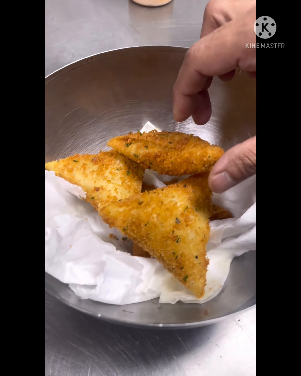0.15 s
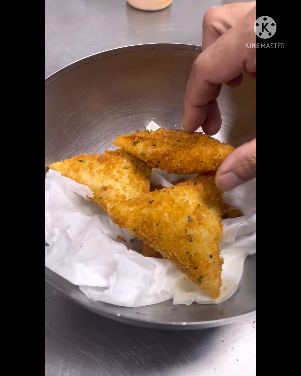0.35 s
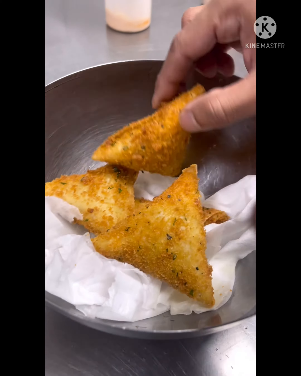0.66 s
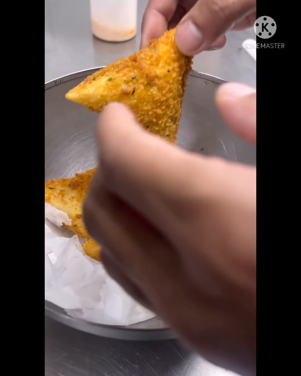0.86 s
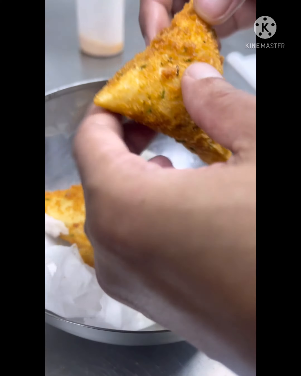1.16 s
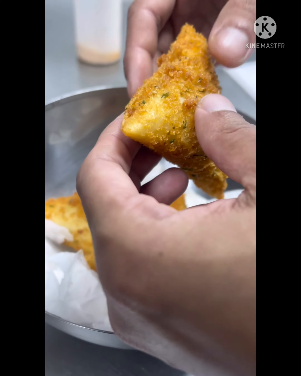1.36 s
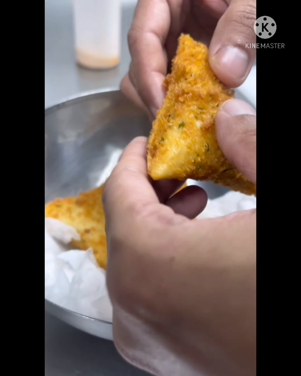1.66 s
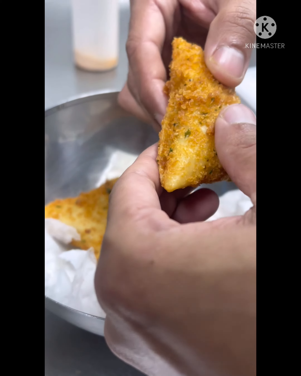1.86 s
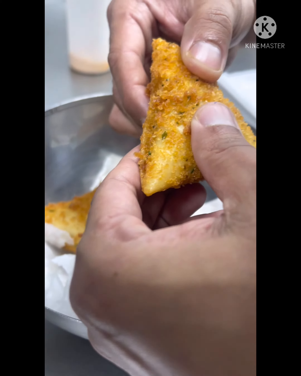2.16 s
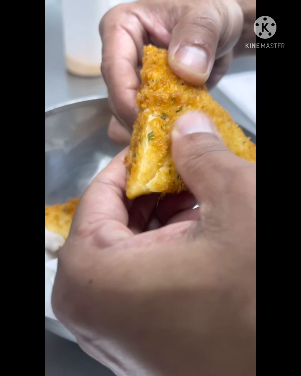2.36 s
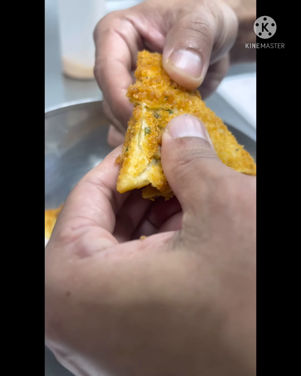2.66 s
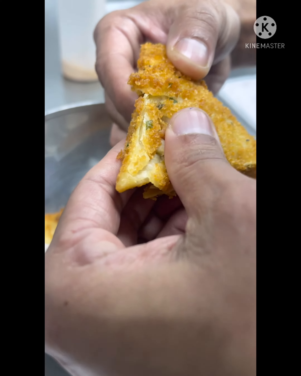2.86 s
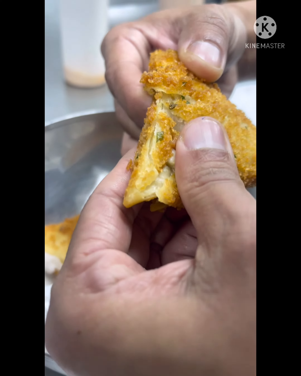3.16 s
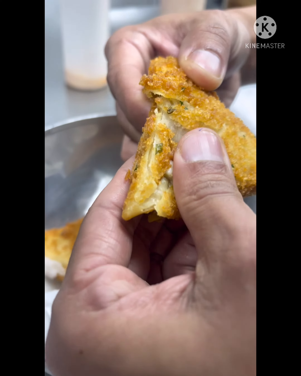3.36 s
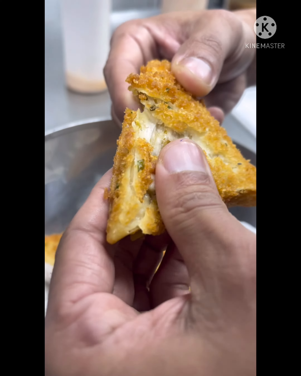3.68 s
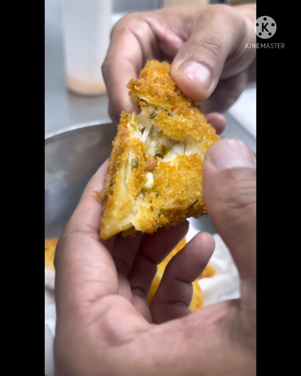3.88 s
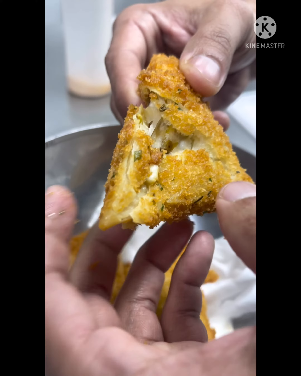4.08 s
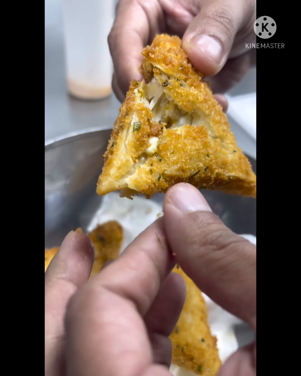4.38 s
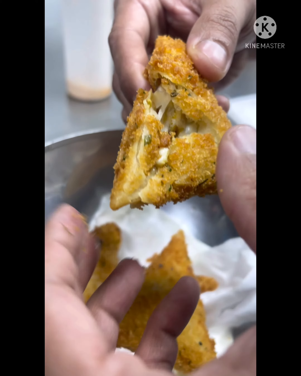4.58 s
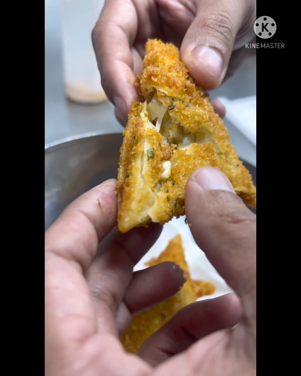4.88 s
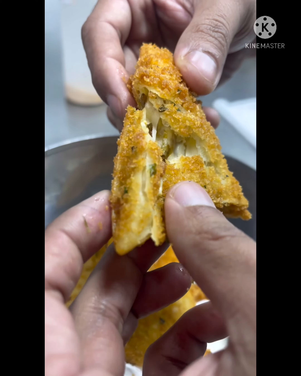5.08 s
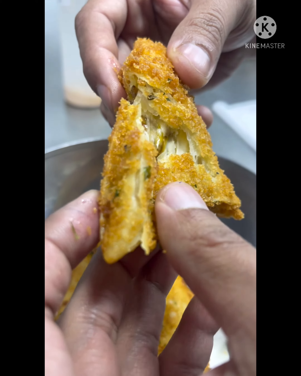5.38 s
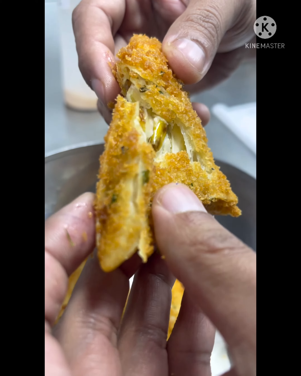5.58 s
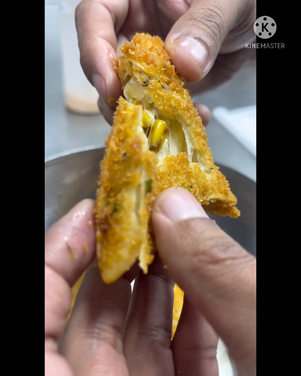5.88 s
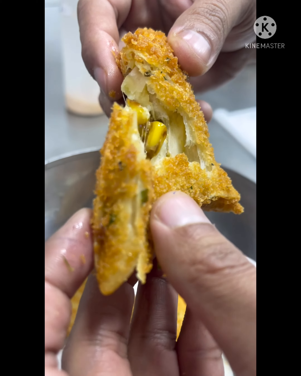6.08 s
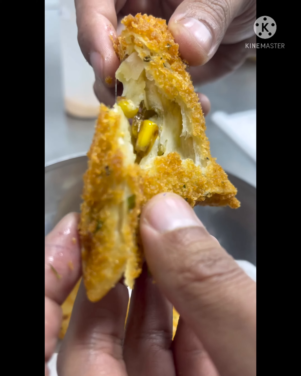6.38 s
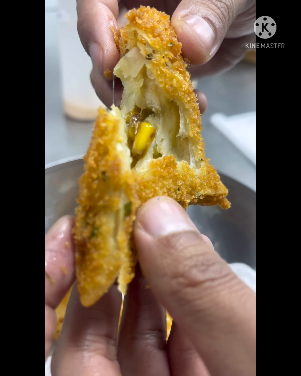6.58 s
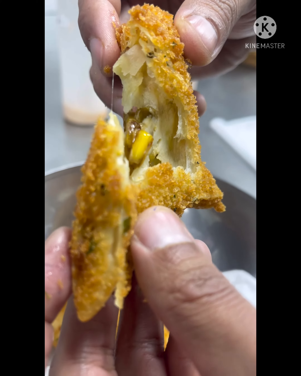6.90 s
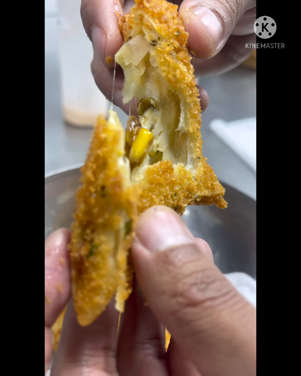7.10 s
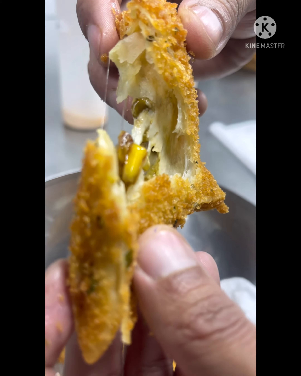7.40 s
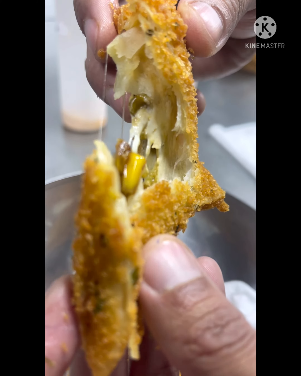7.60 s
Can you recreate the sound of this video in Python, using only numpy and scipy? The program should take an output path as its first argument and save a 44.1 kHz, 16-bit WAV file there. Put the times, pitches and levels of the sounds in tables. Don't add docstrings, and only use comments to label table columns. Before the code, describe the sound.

Brittle crust ticks, crunches and splits sharply close up, then crumbles faintly, while kitchen fans rumble and a distant door thuds.

```python
import sys
import numpy as np
from scipy import signal
from scipy.fft import rfft, irfft
from scipy.io import wavfile
from scipy.ndimage import uniform_filter1d, minimum_filter1d

SR = 44100
rng = np.random.default_rng(int(sys.argv[2]) if len(sys.argv) > 2 else 0)


def invert_db(level):
    return 10 ** (np.asarray(level, dtype=float) / 20)


def generate_wav(sig):
    pcm = np.round(np.clip(np.atleast_2d(sig).T, -1, 1) * 32767).astype(np.int16)
    wavfile.write(sys.argv[1], SR, pcm)


N = 341504

# (frequency [Hz], coherence [0-1])
NEAR_LIKENESS = [(700, .6), (2000, .9), (3000, .55), (4500, .65), (4800, .74), (4950, .76), (5200, .6),
                 (5500, .88), (6200, .88), (6600, .65), (8000, .7), (8400, .86), (8600, .97), (9300, .97),
                 (9600, .86), (10000, .85), (12000, .91), (13800, .86), (14300, .7)]


def pastry():
    dry = snaps() + crushes() + rustle(*grip_db()) + flakes()
    hands = tail([(1000, 0.002), (12000, 0.0017)], count=1024)[0]
    scattered = signal.oaconvolve(dry, hands)[:N]
    steel = tail([(1000, 0.06), (12000, 0.041)], count=6000)
    bowl = signal.oaconvolve(dry[None], steel, axes=1)[:, :N]
    close = np.array([dry, scattered]) + invert_db(-11) * bowl
    return ports(*close, NEAR_LIKENESS) + invert_db(-16) * kitchen(dry)


# (time [s], fizz energy [dB], shell level re fizz [dB], body level re fizz [dB])
SNAPS = [(.6514, -12, -11, -12), (.6594, -10, -14, -11), (.6925, -24, 4, 1), (.9519, -16, -8, -9),
         (1.7255, -17, -6, -15), (1.8662, -11.5, -12, -8), (2.01, -14, -13, -10), (2.0827, -4.5, -11, -20),
         (2.0983, -6, -10, -10), (2.1283, -12, -6, -17), (2.2199, -9, -8, -23), (2.2293, -16, -10, -17),
         (2.2847, -5, -23, -12), (2.3316, -10, -1, -3), (2.3564, -11, -6, -2), (2.3598, -3, -11, -22),
         (2.374, -14, -10, -25), (2.397, -7.5, -5.5, 1), (2.4017, 2, -10, -9), (2.4345, 4, -13, -7),
         (2.4544, -8, -13, -13), (2.4758, 0, -8, -1.5), (2.479, -23, -10, -3), (3.8328, -20, -9, 6),
         (4.3242, -22, -14, -22), (4.3261, -13, -29, -29)]
CRACKS = [(2.4064, -13, -6, -13), (2.4116, -9, -9, -7), (2.4157, -9, -8, -2), (2.4185, -4, -6, -7),
          (2.4206, -8, -4, -9), (2.4226, -7, -6, -8), (2.4259, 0, -8, -6), (2.4278, -1, -7, -6),
          (2.4296, -1, -6, -8), (2.4312, -7, -5, -4), (2.4374, -9, -6, -6), (2.4392, -4, -6, -5),
          (2.4435, -7, -4, -8), (2.4455, -10, -5, -6), (2.4492, -14, -5, -7), (2.4595, -22, -4, -2),
          (2.4623, -20, -1, -2), (2.4672, -23, -9, -2), (2.4701, -18, -5, 2)]
CRUMBS = [(0.8904, -25, -4, -2), (1.2481, -31, -2, -3), (1.3663, -29, -5, -4), (1.8454, -24, -9, -2),
          (1.8502, -28, -9, 1), (1.9405, -31, -5, 1), (2.0303, -25, -1, 0), (2.0652, -24.5, -2, -4),
          (2.147, -23, -6, -12), (2.1655, -27, -2, 0), (2.2104, -21, -9, -7), (2.2548, -25, -19, -10),
          (2.5223, -26, -7, -5), (2.7945, -29, -11, -6), (2.8, -29, 2, 3), (2.9183, -29, -4, -3),
          (2.9851, -28, -8, -5), (3.0335, -30, -1, -1), (3.0889, -28, -2, -6), (3.1985, -37, -4, 12),
          (3.3243, -29, -2, 1), (3.3348, -42, 8, 5), (3.3677, -34, -3, 3), (3.4291, -37, -2, 8),
          (3.447, -24.5, -1, 1), (3.485, -29, 0, -6), (3.5683, -31, -1, -6), (3.6082, -28, -8, -6),
          (7.4215, -30, 5, -1), (7.4393, -28, 11, -10)]
CHIPS = [(0.33, -52, 25, 15), (0.3399, -29, 0, 12), (0.3492, -33, -6, 8), (0.5475, -34, 1, 13),
         (0.5523, -36, -7, 4), (0.6073, -30, 7, 11), (0.6268, -22, -13, -1), (0.7152, -31, 3, 10),
         (0.7254, -20, -7, -9), (0.8039, -37, 2, 0), (0.8137, -30, -3, -2), (0.9916, -31, 3, 8),
         (1.0267, -31, -6, -6), (1.0408, -32, -8, -2), (1.2654, -37, -18, 5), (1.4504, -34, -9, 8),
         (1.7439, -36, -15, 2), (1.8185, -30, -8, -4), (1.9768, -34, -1, 3), (2.0553, -28, -11, -7),
         (2.0761, -23, -14, -10), (2.2613, -28, -7, 1), (2.5498, -35, -18, -5), (2.5595, -28.5, -5, -6),
         (2.9239, -27, -7, -4), (3.007, -33, -5, -2), (3.1025, -40, 4, 2), (3.1707, -37, -4, -2),
         (3.3563, -28, -6, -2), (3.4124, -33, 5, 4), (3.5172, -27, 2, 9), (3.5492, -39, 8, 2),
         (3.8224, -33, -5, -5), (4.3147, -35, -11, 2), (4.4227, -29, -12, -6), (4.5729, -32, -17, -8),
         (4.7559, -29, -4, -3), (4.796, -28.5, -19, -3), (6.0377, -39, 2, 14), (6.4168, -25, -11, 0),
         (6.9894, -40, -11, 1), (7.174, -43, -4, 10), (7.5445, -36, 12, -3), (7.6692, -39, 14, 7),
         (7.7225, -34, 6, -2)]
# (time [s], fizz energy [dB], depth: shell and body level re fizz [dB])
TICKS = [(.2555, -28, 0), (0.4947, -27, -10), (.5988, -25, 2), (.612, -24, -0.5), (.6811, -15, -10),
         (0.9845, -23, 5.5), (1.1022, -28, 7.5), (1.6038, -25, -14), (1.664, -30, -3), (2.4924, -23, -8),
         (2.5162, -16.5, -16), (2.5625, -20, -19), (2.5895, -22, -19), (2.8604, -19, -12),
         (2.898, -23.5, 3.5), (3.051, -20, 1.5), (3.3146, -24.5, 2), (3.473, -24, 1), (3.5082, -24, -6),
         (3.5259, -20.5, 1.5), (3.54, -19, -5), (4.7264, -18.5, -10), (5.977, -20, -9), (7.0102, -26, 3.5),
         (7.5695, -18, -10), (7.7187, -23, -4)]


def snaps():
    t, drive = np.arange(256) / SR, np.zeros((3, N))
    ticks = [(s, db, depth_db + .6, depth_db - .6) for s, db, depth_db in TICKS]
    breaks = SNAPS + ticks + CRUMBS + CRACKS + CHIPS
    grit = rng.standard_normal((len(breaks), 256))
    for (s, fizz_db, shell_db, body_db), small_slips in zip(breaks, grit):
        burst = 0.24 * small_slips * np.exp(-t / 0.0012) + (t == t[16])
        burst = burst / np.linalg.norm(burst)
        levels_db = fizz_db - .6, fizz_db + shell_db - .6, fizz_db + body_db - 2.5
        for row, db in zip(drive, levels_db):
            add(row, s, invert_db(db) * burst)
    return crust(*drive)


# (time [s], length [s], fizz energy [dB], shell level re fizz [dB], body level re fizz [dB])
CRUSHES = [(.635, .005, -13, -15, -12), (0.6502, .013, -4.5, -13, -10), (.691, 0.0087, -18, -6, -1),
           (.813, .012, -14.5, -2.5, -14), (.872, .006, -20, -8, -6), (.914, .01, -17.5, -11, -3),
           (.951, .006, -14, -8, -10), (1.031, .01, -20, -12, -12), (2.727, 0.0092, -14, -20, -20),
           (2.768, .005, -16, -17, -15), (2.82, .006, -23, -9, -7), (4.547, .009, -23, -16, -16),
           (1.9872, .002, -16, -7, -11), (.579, .005, -31, -3, -3), (.617, .008, -20, -14, -11),
           (5.131, .003, -35, -15, -10)]


def crushes():
    t, drive = np.arange(1024) / SR, np.zeros((3, N))
    grits = rng.standard_normal((len(CRUSHES), 4, 1024))
    for (s, length, fizz_db, shell_db, body_db), grit in zip(CRUSHES, grits):
        bursts = grit[:3] * invert_db(2.7 * grit[3]) * np.exp(-(t / length) ** 4)
        levels_db = fizz_db, fizz_db + shell_db, fizz_db + body_db
        for row, burst, db in zip(drive, bursts, levels_db):
            add(row, s, invert_db(db) * burst / np.linalg.norm(burst))
    return crust(*drive)


def rustle(grip, depth_db):
    firm_db = -50
    shell_db = firm_db + depth_db - 3 + 0.95 * (grip - firm_db)
    body_db = firm_db + depth_db + 4 + 0.66 * (grip - firm_db)
    clumps = invert_db(4.3 * evened(uniform_filter1d(rng.standard_normal(N), size=150)))
    hit = rng.random(N) < 6000 / SR * clumps
    size_db = 2.3 * np.minimum(rng.exponential(1, N), 5)
    grains = hit * rng.standard_normal((3, N)) * invert_db(size_db)
    return crust(*(evened(grains) * invert_db([grip - .6, shell_db - .6, body_db - 5.5])))


# (time
# of hardest grip [s], fizz level [dB], build-up [s], let-go [s], depth [dB])
SQUEEZES = [(.266, -45.5, 0.065, 0.058, 1.5), (.347, -54, .1, 0.23, 5), (.652, -39.5, 0.11, 0.12, 0.5),
            (.872, -46.5, 0.1, 0.34, 4.5), (.98, -53, 0.33, 0.076, 0), (1.12, -62, 0.089, 0.14, 10),
            (1.253, -56, 0.094, 0.072, -2), (1.415, -61.5, 0.35, 0.55, 4), (1.663, -47.5, 0.092, 0.14, 4),
            (1.86, -57.5, 0.19, 0.51, 0), (2.093, -60, .4, .3, -1), (2.22, -51, 0.21, 0.33, 3.5),
            (2.36, -43, 0.045, 0.33, 1.5), (2.43, -21.5, 0.043, 0.021, -1.5), (2.44, -25, .03, 0.013, -4),
            (2.459, -39, .03, 0.053, 1), (2.74, -53, 0.24, 0.33, 4), (3.056, -60, 0.32, 0.46, 3.5),
            (3.33, -62, .14, 0.16, -9), (3.537, -55.5, 0.21, 0.61, -5.5),
            (3.704, -56.5, 0.54, 0.25, 9.5), (4.0, -60.5, 0.039, 0.26, 9), (4.326, -40.5, .003, 0.042, -7),
           (4.4, -57, 0.11, 0.36, -2), (4.58, -56, 0.12, .3, 2.5), (4.838, -54, 0.29, 0.067, -2),
           (5.011, -54, 0.26, 0.25, 2.5), (5.612, -60.5, .07, 0.49, 1), (5.986, -65, 0.45, .7, -6),
           (6.296, -61, .09, 0.4, -1), (6.425, -49, 0.034, 0.16, 4.5), (6.923, -62, 0.31, 0.52, -2),
           (7.445, -45, 0.047, 0.19, -2), (7.74, -63, 0.37, .3, 4)]


def grip_db():
    rest_db, span_db = -69.5, 20
    t = np.arange(0, N + 32, 32) / SR
    power, depth = invert_db(2 * rest_db), 0
    for s, db, rise, fall, depth_db in SQUEEZES:
        away = np.maximum((s - t) / rise, (t - s) / fall)
        part = invert_db(2 * (db - span_db * away))
        power = power + part
        depth = depth + part * depth_db
    curves = 10 * np.log10(power), depth / power
    return [np.interp(np.arange(N) / SR, t, curve) for curve in curves]


# (time [s], length [s], level [dB], resonance [Hz], bandwidth [Hz])
FLAKES = [
    (0.6505, 0.0114, -34, 1750, 1200),
    (0.7035, 0.007, -35.5, 2800, 690),
    (2.4162, 0.00486, -31, 1330, 420),
    (2.42, 0.01, -35, 2300, 470),
    (2.428, 0.013, -36.5, 590, 250),
    (4.3245, 0.0068, -34, 8700, 420),
    (1.666, 0.015, -46, 3100, 1000),
    (.713, 0.005, -33.5, 2940, 990),
    (2.426, .01, -41, 2300, 900),
    (2.3, .008, -41, 2500, 2000),
]


def flakes():
    dry = np.zeros(N)
    grits = rng.standard_normal((len(FLAKES), 2, 2048))
    for (s, length, db, hz, width_hz), grit in zip(FLAKES, grits):
        burst = grit[0] * invert_db(0.94 * grit[1]) * (np.arange(2048) < length * SR)
        band = signal.butter(2, [hz - width_hz / 2, hz + width_hz / 2], "band", fs=SR)
        tone = signal.lfilter(*band, burst)
        add(dry, s, invert_db(db) * tone / np.linalg.norm(tone) * np.sqrt(length * SR))
    return dry


# (frequency [Hz], spectral density [dB per Hz])
CRUST = [(700, -12.5), (1500, -18.5), (2300, -13), (3100, -11.5), (4000, -17), (5100, -13.5), (6500, -11),
         (8000, -8), (9500, -4), (11000, 0.5), (12100, -5.5), (13000, -18), (14000, -22), (15200, -34),
         (16200, -48.5)]


def crust(fizz, shell, body):
    high = colour(fizz, CRUST, lo_hz=8660)
    middle = colour(shell, CRUST, 3700, 8800)
    low = colour(body, CRUST, 800, 4840)
    return high + middle + low


def clatter():
    dry = np.zeros(N)
    dishes(dry)
    door(dry)
    return invert_db(-2.5) * ports(dry, dry, FAR_LIKENESS) + invert_db(-9) * kitchen(dry)


# (time [s], peak [dB], ring pitch [Hz], bandwidth [Hz], scrape decay [s], ring level [dB])
DISHES = [
    (0.333, -47.5, 2600, 1440, 0.078, -25),
    (1.402, -44.5, 1813, 1000, 0.059, 2.5),
    (1.642, -45.5, 2656, 1600, 0.082, -3),
    (2.677, -38, 2640, 350, 0.037, -7.5),
]
# (pitch ratio [1], level [dB], t60 [s])
CHINA = [
    [(1, -9, .2), (1.2, -12, .2)],
    [(1, -13, .3), (1.155, -5.5, 0.37), (1.232, -11, 0.29), (1.44, -10, .25)],
    [(1, -6, .45), (.694, -7, 0.33), (1.5, -11, .3), (1.317, -9, .25), (1.6, -14, .4)],
    [(1, -4, .25), (.78, -11, 0.36), (1, -11, 0.31), (1.44, -23, .12), (1.64, -23, .12)],
]


def dishes(dry):
    t = np.arange(8000) / SR
    for (s, db, hz, width_hz, length, ring_db), modes in zip(DISHES, CHINA):
        scrape = rng.standard_normal(len(t)) * np.exp(-t / length)
        band = signal.butter(2, [max(hz - width_hz / 3, 300), hz + width_hz], "band", fs=SR)
        knock = 1.9 * signal.lfilter(*band, scrape)
        tuned = [(hz * ratio, mode_db, t60) for ratio, mode_db, t60 in modes]
        china = ring(tuned, t) * (1 - np.exp(-t / 0.0043))
        add(dry, s, invert_db(db + 6.5) * (knock + invert_db(ring_db) * china))


# (time [s], peak [dB], rattle level [dB],
# pitch from [Hz], pitch to [Hz], blow length [s])
THUDS = [
    (.69, -23.5, -6, 105, 101, 0.067),
    (1.405, -27.5, -2, 260, 240, 0.028),
    (3.979, -24.5, 3, 287, 302, 0.0306),
    (6.41, -9.5, -5, 226, 480, 0.028),
]
# (frequency [Hz], spectral density [dB per Hz])
RATTLE = [(100, -11.5), (170, -4.5), (260, -1.5), (440, -11.5), (600, -8.5), (900, -20), (1600, -25),
          (2500, -31.5), (5000, -37), (9000, -37), (11500, -31), (12500, -58), (13500, -54)]
# (frequency [Hz], level [dB], t60 [s])
DOOR = [(120, -12, .2), (524, -13, 0.1), (805, -3, 0.033), (1080, -17, 0.08), (1688, -13, 0.04)]


def door(dry):
    t = np.arange(8000) / SR
    rebound_modes = [(262.3, -2.5, 0.31), (437, -4.5, 0.2), (690, -16, 0.19), (562, -16.0, 0.29)]
    rebound = ring(rebound_modes, t) * (1 - np.exp(-t / 0.0023))
    for s, db, rattle_db, from_hz, to_hz, blow_s in THUDS:
        shut = np.minimum(t / blow_s, 1)
        leaf = np.sin(2 * np.pi * np.cumsum(from_hz + (to_hz - from_hz) * shut) / SR)
        blow = (0.91 * leaf + ring(DOOR, t)) * np.sin(np.pi * shut ** 0.91) ** 1.8
        shake = rng.standard_normal(len(t)) * np.exp(-t / 0.045) * np.minimum(t / .007, 1)
        rattle = colour(shake, RATTLE)
        add(dry, s - .003, invert_db(db - 1.0) * (blow + invert_db(rattle_db - 5) * rattle))
        add(dry, s + 0.036, invert_db(db - 7.5) * rebound)


# (frequency [Hz], spectral density [dB per Hz])
RUMBLE = [(22, -21), (32, -43), (45, -4), (70, 0.66), (110, -5.5), (200, -5), (290, -2.5), (350, -9),
          (420, -17.5), (520, -19), (900, -20), (1500, -24.5), (2600, -33), (4500, -43.5)]
# (frequency [Hz], spectral density [dB per Hz])
HISS = [(3000, -22), (5000, -2), (8000, 0), (9500, 5), (11300, -4), (12000, -12), (12800, -20),
        (13500, -26), (15000, -42)]
# (frequency [Hz], level [dB])
HUM = [
    (48.0, -42),
    (861.3, -59.5),
    (969.0, -58),
]


def fans():
    drift = uniform_filter1d(rng.standard_normal((3, N)), size=6000)
    waver = evened(uniform_filter1d(drift, size=6000))
    hum = 0
    for (hz, db), pitch_waver, level_waver in zip(HUM, waver, waver[::-1]):
        turns = np.cumsum(hz + 1.51 * pitch_waver) / SR
        hum = hum + invert_db(db + 5.0 + 1.1 * level_waver) * np.sin(2 * np.pi * turns)
    rumble = invert_db(-31.28) * ducts(noise(RUMBLE + [(7000, -69.5)], patchy_db=0.81, swell_db=0.99))
    hiss = invert_db(-56.5) * noise([(1500, 1.5)] + HISS, patchy_db=0.93, swell_db=0.81)
    return ports(*(rumble + hiss + hum * np.array([[1], [0]])), FAR_LIKENESS)


# (frequency [Hz], bandwidth [Hz], lift [dB])
DUCTS = [(68, 16, 3.5), (105, 13, 4), (124.5, 7.6, 3), (151.7, 10.4, 5), (215, 9.4, 2.5), (260, 8.2, 2),
         (290.6, 8.3, 2.5), (351, 26, 5.5), (461, 30, 4.5), (617.2, 26, 7.5)]


def ducts(x):
    hz = np.fft.rfftfreq(N, 1 / SR)
    lift_db = sum(db / (1 + (2 * (hz - f) / width_hz) ** 2) for f, width_hz, db in DUCTS)
    return evened(irfft(rfft(x) * invert_db(lift_db), N))


# (frequency [Hz], t60 [s])
KITCHEN = [(150, 0.25), (400, 0.3), (1000, 0.49), (3000, 0.27), (8000, 0.21), (14000, 0.059)]
# (frequency [Hz], coherence [0-1])
FAR_LIKENESS = [(210, 1), (400, .85), (700, .35), (1150, .1), (1900, .8), (2800, .35), (4200, .4),
                (4600, .6), (4800, .8), (4980, .83), (5200, .6), (5500, .9), (6200, .9), (6600, .75),
                (8000, .75), (8400, .94), (9600, .94), (10000, .8), (12000, .95)]


def kitchen(x):
    reverberant = signal.fftconvolve(x[None], tail(KITCHEN, count=SR), axes=1)
    return ports(*reverberant[:, :N], FAR_LIKENESS)


# (frequency [Hz], phase [rad])
PORTS = [(90, 0), (400, -.2), (800, .8), (1500, -.2), (2100, .15), (2800, 1), (4250, 1.1), (4600, 2),
         (4800, 2.9), (4990, 3.4), (5150, 4.6), (5450, 6.15), (6200, 6.35), (8150, 8.35), (8450, 9.15),
         (9350, 9.7), (11500, 11.6), (11900, 12.4), (13800, 12.7), (14300, 14.7)]


def ports(a, b, likeness):
    hz = np.fft.rfftfreq(N, 1 / SR)
    same = np.clip(read(likeness, hz), 0, 1)
    turn = np.exp(.5j * read(PORTS, hz))
    left = rfft(a) * turn
    right = (same * rfft(a) + np.sqrt(1 - same ** 2) * rfft(b)) / turn
    return irfft(np.array([left, right]), N)


def tail(decays, count):
    hz, t, z = signal.stft(rng.standard_normal((2, count)), SR, nperseg=128)
    t60 = np.clip(read(decays, hz), .002, 3)[:, None]
    out = signal.istft(z * invert_db(-60 * t / t60), SR, nperseg=128)[1]
    return out / np.linalg.norm(out, axis=1)[:, None]


def ring(modes, t):
    return sum(invert_db(db - 60 * t / t60) * np.sin(2 * np.pi * hz * t) for hz, db, t60 in modes)


def noise(points, patchy_db, swell_db):
    frames, hz = N // 512 + 5, np.fft.rfftfreq(2048, 1 / SR)
    a, b, c, d, patches = rng.standard_normal((frames, 1025, 5)).T
    patches = uniform_filter1d(patches, size=20, axis=0)
    patches = evened(uniform_filter1d(patches, size=8, axis=1))
    swell = evened(uniform_filter1d(rng.standard_normal(frames), size=30))
    level_db = read(points, hz)[:, None] + patchy_db * patches + swell_db * swell
    z = np.array([a + 1j * b, c + 1j * d]) * invert_db(level_db)
    return evened(signal.istft(z, nperseg=2048, noverlap=1536)[1][:, :N])


def colour(x, points, lo_hz=1, hi_hz=30000):
    hz = abs(np.fft.fftfreq(4096, 1 / SR)) + 1
    edges = 1 / ((1 + (lo_hz / hz) ** 8) * (1 + (hz / hi_hz) ** 8))
    log_gain = np.log(invert_db(read(points, hz)) * edges + 1e-5)
    phase = -signal.hilbert(log_gain).imag
    taps = np.fft.ifft(np.exp(log_gain + 1j * phase)).real[:2048]
    return signal.oaconvolve(x, taps / np.linalg.norm(taps))[:len(x)]


def evened(x):
    return x / np.sqrt(np.mean(x ** 2) + 1e-20)


def read(points, hz):
    f, value = np.transpose(points)
    return np.interp(np.log(hz + 1), np.log(f + 1), value)


def add(mix, s, sound):
    part = mix[round(s * SR):][:len(sound)]
    part += sound[:len(part)]


def scene():
    return pastry() + clatter() + fans()


def band_limit(x):
    return signal.sosfilt(signal.butter(12, 16440, fs=SR, output="sos"), x)


# (frequency [Hz], level [dB])
QUIET = [(4000, -110), (11000, -91.5), (12500, -90), (16000, -92)]


def record(dry):
    cut = signal.sosfilt(signal.butter(6, 36, "high", fs=SR, output="sos"), dry)
    cut = .55 * np.tanh(cut / .55)
    pair = np.array([cut[0] + cut[1], cut[0] - cut[1]]) / 2
    hz, t, z = signal.stft(pair, SR, nperseg=2048, noverlap=1024)

    starts = np.r_[np.arange(0, 240, 8), np.arange(240, len(hz), 16)]
    widths = np.diff(np.r_[starts, len(hz)])
    bands = np.add.reduceat(abs(z) ** 2, starts, axis=1) / widths[:, None]
    level_db = 10 * np.log10(np.repeat(bands, widths, axis=1) + 1e-20)

    chance = evened(uniform_filter1d(rng.standard_normal(bands.shape), size=3))
    spared = (chance > 1.7) * (hz[starts, None] > 12500)
    judged_db = level_db + np.repeat(2 * chance + 12 * spared, widths, axis=1)
    buried = (judged_db < level_db[::-1] - 8.5) & (hz[:, None] > 4300)
    loudest_treble_db = level_db[:, 440:].max((0, 1))
    masked = (judged_db < loudest_treble_db - 33) & (hz[:, None] > 13000)

    treble = np.diff(pair[0], 2, prepend=[0, 0]) ** 2
    peaky = uniform_filter1d(treble, size=128) / (uniform_filter1d(treble, size=2048) + 1e-20)
    peakiest = -minimum_filter1d(-peaky, size=1024)
    click = np.interp(t * SR, np.arange(N), peakiest) > invert_db(17)
    faint = masked | (judged_db < read(QUIET, hz)[:, None] - 4 * click)
    dropped = faint | (buried & ~click)
    kept = signal.istft(z * ~dropped, SR, nperseg=2048, noverlap=1024)[1][:, :N]

    needle = np.minimum(2 * uniform_filter1d(1. * (peaky > invert_db(17)), size=128), 1)
    mid, side = kept + needle * (pair - kept)
    return band_limit(np.array([mid + side, mid - side]))


dry = scene()
out = record(dry)
generate_wav(out)
```